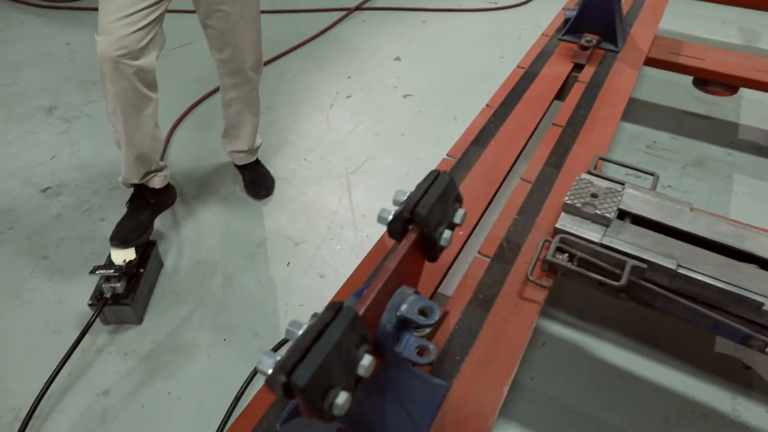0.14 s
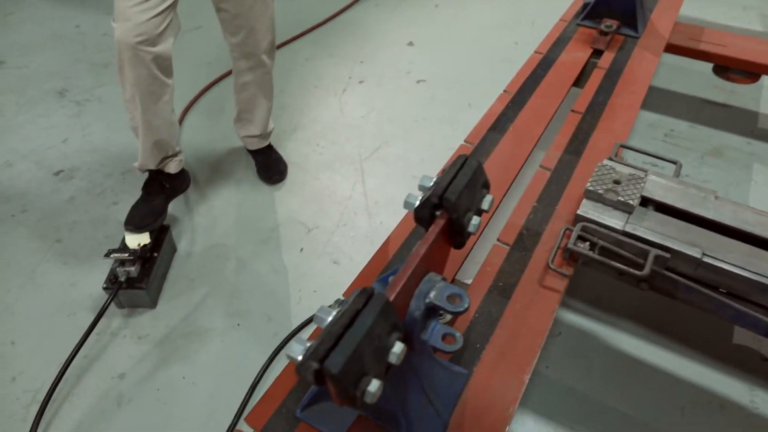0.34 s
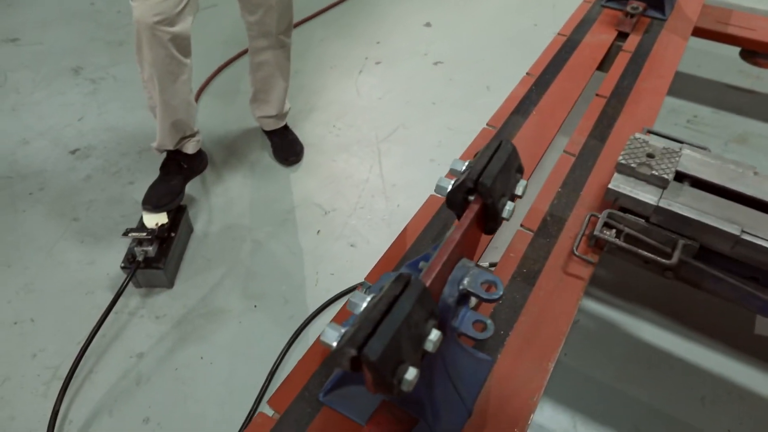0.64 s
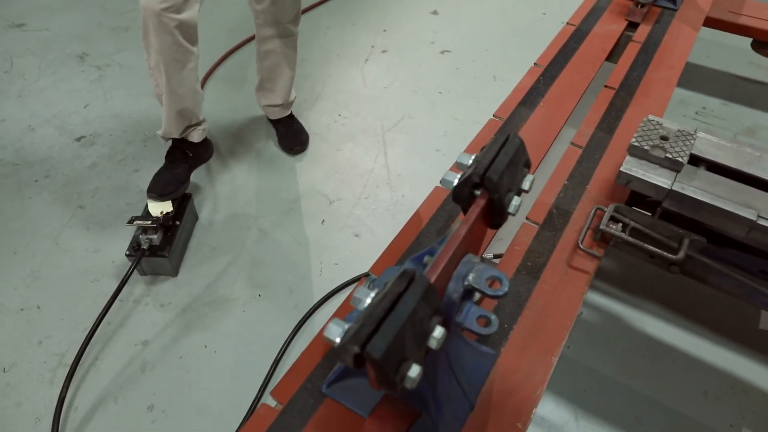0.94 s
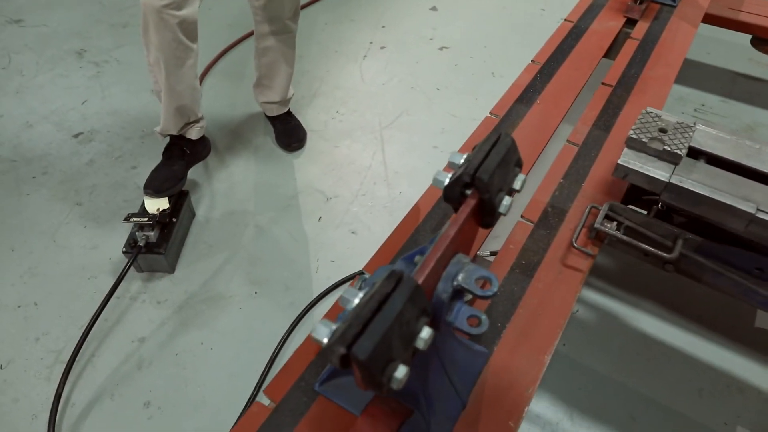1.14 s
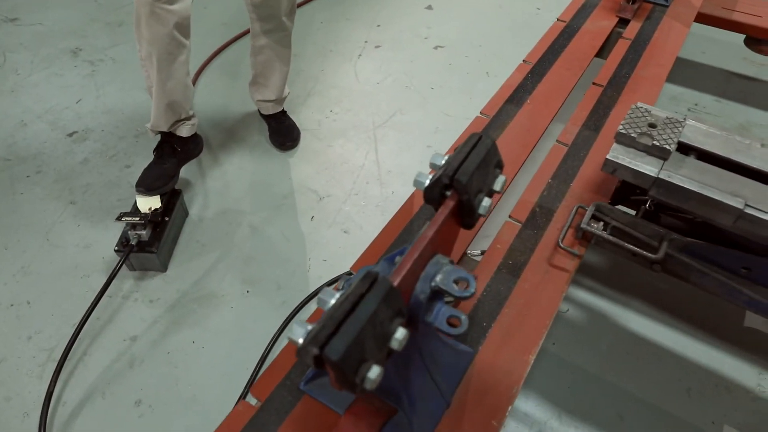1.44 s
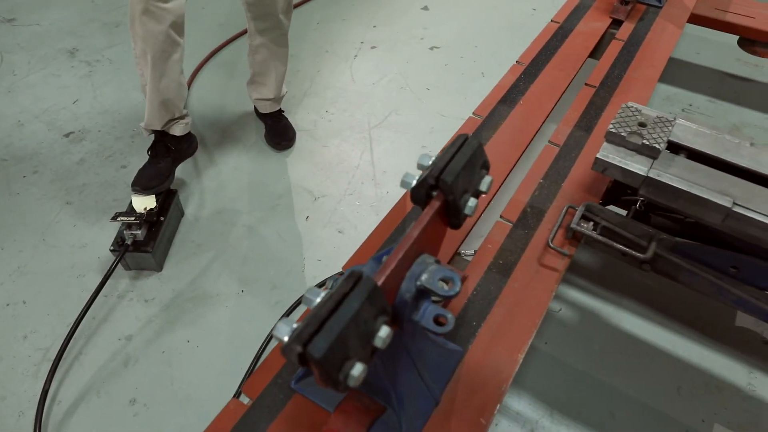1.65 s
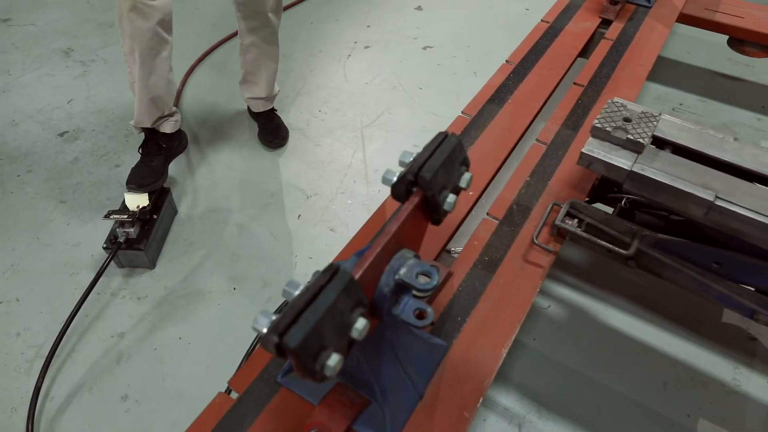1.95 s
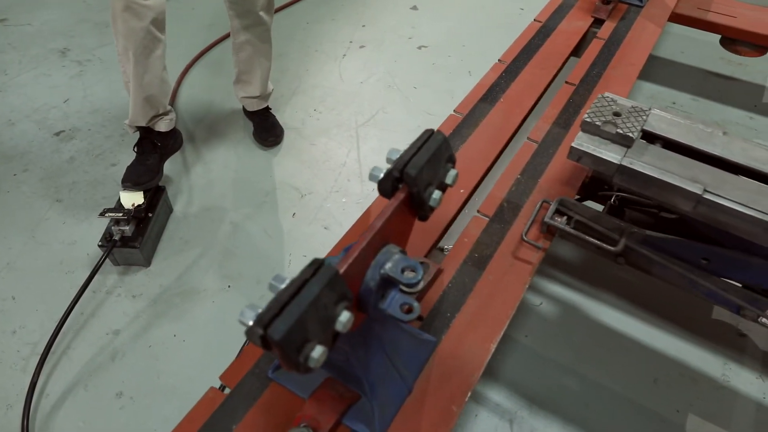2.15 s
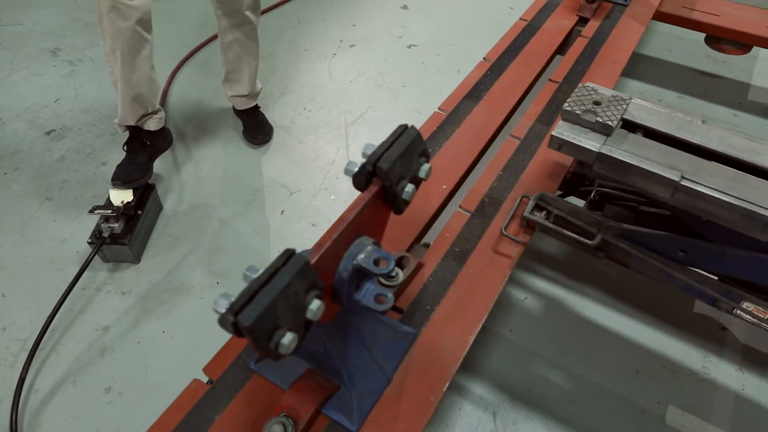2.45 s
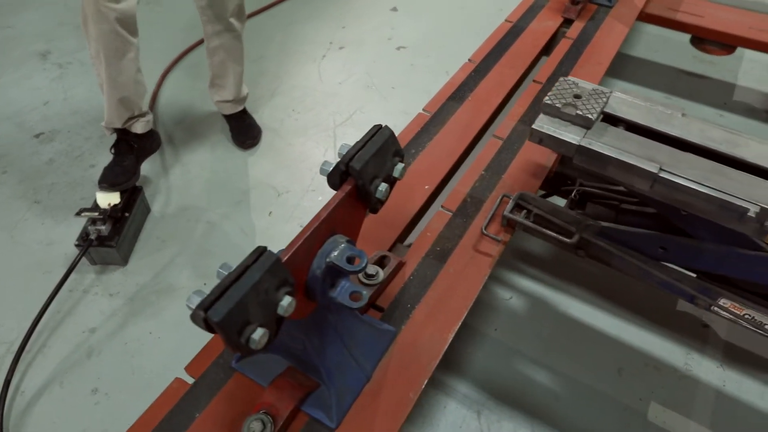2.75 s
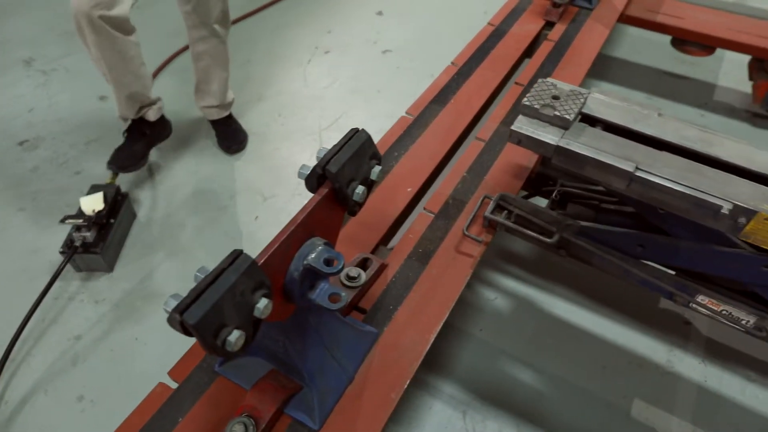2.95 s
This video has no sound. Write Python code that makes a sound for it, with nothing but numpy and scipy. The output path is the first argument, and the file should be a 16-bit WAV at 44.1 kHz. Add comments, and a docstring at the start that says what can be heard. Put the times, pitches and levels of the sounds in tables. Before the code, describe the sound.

An air-powered pump pulses rapidly with a loud hiss, slows briefly, then speeds up and stops.

```python
"""Air pump raising a scissor lift

A foot pedal clicks and starts an air-driven hydraulic pump in a workshop. Running free, the piston
pops about 23 times a second over a loud exhaust hiss. Midway it labours under load: slow puffs, each
with a thump and a return knock, ring the lift's frame. It runs free again, stops, and the hall dies away."""
import sys
import numpy as np
from scipy import signal
from scipy.io import wavfile
from scipy.ndimage import uniform_filter1d

SR = 44100
rng = np.random.default_rng(int(sys.argv[2]) if len(sys.argv) > 2 else 0)


def dump(signal):
    """Clip the signal to [-1, 1] and save it as 16-bit WAV at the path in sys.argv[1]."""
    limited = np.clip(np.atleast_2d(signal).T, -1, 1)
    pcm = np.round(limited * 32767).astype(np.int16)
    wavfile.write(sys.argv[1], SR, pcm)


N = 136710
T = np.arange(N) / SR  # seconds since the scene began
AGE = np.arange(SR // 5) / SR  # seconds since one short sound began


# Stretches of free running: (first stroke [s], last stroke [s], first level [dB], last level [dB])
FREE_RUNS = [(0.2786, 0.5023, -6, 1), (0.5445, 1.236, -0.5, 2.5), (2.212, 2.297, 2.5, -0.5),
             (2.3367, 2.7615, 5.5, 1.5)]
STROKE_GAP_S, FIRST_STROKE_S, FIRST_STROKE_DB = .0434, .2310, 4.5

def free_strokes():
    """The piston starts hard, then beats evenly. Gives rows of (time [s], level [dB])."""
    strokes = [(FIRST_STROKE_S, FIRST_STROKE_DB)]
    for first, last, first_db, last_db in FREE_RUNS:
        count = round((last - first) / STROKE_GAP_S) + 1
        levels = np.linspace(first_db, last_db, count) + 0.2 * rng.standard_normal(count)
        strokes += zip(np.linspace(first, last, count), levels)
    return strokes


# How strongly air leaves the exhaust: (time [s], level [dB])
AIR_FLOW = [(.195, -45), (.229, -3.5), (.234, 0), (.40, 1), (.80, 0.5), (1.255, 0), (1.285, -8),
            (1.855, -45), (1.875, -12.5), (2.15, -7), (2.24, 0), (2.35, 1.5), (2.60, 0.5), (2.775, 1.5),
            (2.805, -19), (2.9, -70)]
# Tone of the hiss and of the pop: (frequency [Hz], level [dB])
HISS_TONE = [(60, -25), (150, -2.5), (300, 1), (500, -3.5), (750, -10.5), (950, -1), (1130, 2.5),
             (1300, -2), (1700, 3), (2200, 1), (2550, 2.5), (2900, -2.5), (3600, 1.5), (4250, 2.5),
             (4900, -0.5), (5600, 1.5), (7300, -0.5), (8800, -2), (10000, -1.5), (12500, 2.5), (15500, 0.5)]
POP_TONE = [(200, -5), (450, 0), (800, -22), (2000, -4), (3500, -35), (4500, 4), (5000, 3), (5600, -2.5),
            (7200, -20), (8700, 3.5), (10500, 11), (15500, -11.5)]

def exhaust(strokes):
    """Air pops out as the valve opens, and the fluttering hiss surges with each stroke."""
    flow = amp(np.interp(T, *np.transpose(AIR_FLOW)))
    wobble = uniform_filter1d(rng.standard_normal(N), size=180)
    flutter = np.exp(0.11 * wobble / wobble.std())
    surge = 1 + 0.93 * repeat(strokes, fade(0.0066))
    hiss = amp(-14.5) * noise(flow * surge * flutter, HISS_TONE)
    pops = repeat(strokes, rise(0.00046) * fade(0.00082))
    return hiss + amp(-4.5) * noise(pops, POP_TONE)


# Notes of the metal valve: (frequency [Hz], level [dB], ring time [s])
VALVE_NOTES = [(2146, -19, 0.053), (4810, -5.5, 0.015), (5080, -10, 0.019), (5620, -20, 0.038),
               (8540, -11.5, 0.017), (8990, -15.5, .016), (13230, -16, .016), (15000, -16, 0.015)]
# It opens, bounces and closes: (time after the stroke [s], level [dB])
VALVE_TICKS = [(0, 1.5), (.0105, -9), (.0278, -21)]

def valve(strokes):
    """The shuttle valve ticks three times a stroke, with nearly the same ring each time."""
    out, t = np.zeros(N), AGE[:SR // 50]
    attack = rise(0.00046, t)
    glide = 7 * t  # each tick's pitch flicks upward
    for time, db in strokes:
        for delay, tick_db in VALVE_TICKS:
            tick = np.zeros(len(t))
            for hz, level, ring_s in VALVE_NOTES:
                pitch = hz * (1 + 0.016 * rng.standard_normal() + glide)
                tick += amp(level - 60 * t / ring_s) * np.sin(2 * np.pi * pitch * t)
            jitter_s = .0001 * rng.standard_normal()
            add(out, time + delay + jitter_s, amp(db + tick_db) * attack * tick)
    return out


# Slow strokes under load: (time [s], puff level [dB], thump level [dB], knock level [dB])
LOADED_STROKES = [(1.379, -4, -3, 0.5), (1.497, -2, -1, 3), (1.636, -0.5, -0.5, 3.5), (1.862, 2.5, 1, 1),
                  (1.923, 3, -3.5, 1), (1.985, 3.5, -2, -1.5), (2.047, 3, -3.5, 0), (2.11, 2, -3, -4),
                  (2.162, 2.5, -3, -4)]
# Tone of a puff: (frequency [Hz], level [dB])
PUFF_TONE = [(80, 9), (240, 9.5), (400, -1.5), (550, -6), (800, -8.5), (1400, 2), (2500, -2), (3000, -2.5),
             (3800, -2.5), (6000, -2), (9000, -5), (15500, -1.5)]

def puffs():
    """Under load, each stroke lets out one separate puff of air."""
    hold_s, release_s = .016, 0.0065
    shape = rise(0.00278) * np.exp(-np.maximum(AGE - hold_s, 0) / release_s)
    return amp(-17) * noise(repeat([row[:2] for row in LOADED_STROKES], shape), PUFF_TONE)


# Notes of the pump body and of the lift's frame: (frequency [Hz], level [dB], ring time [s])
BODY_NOTES = [(46, -35, 0.19), (125, -47, 0.02), (157, -34.5, 0.027), (265, -29.5, 0.16), (380, -27, 0.014)]
FRAME_NOTES = [(68.36, -37.5, 1.6), (95, -40, 0.17), (128.7, -28, 0.51), (257.7, -32.5, 0.58),
               (280, -40, 0.33), (1060, -52, .4), (2100, -37, .4)]

def piston(strokes):
    """Each stroke shakes the pump body and rings the lift's frame, with a low thump."""
    body, frame = ring(BODY_NOTES), ring(FRAME_NOTES)
    free_thump = falling_thump(start_hz=222, end_hz=37.8, glide_s=0.00984, rise_s=0.00022, fade_s=0.0089)
    load_thump = falling_thump(start_hz=326, end_hz=43, glide_s=0.0051, rise_s=0.0056, fade_s=0.0094)
    out = repeat(strokes, amp(1.5) * body + amp(-9.5) * frame)
    out += repeat(strokes, amp(-18) * free_thump)
    for time, _, db, _ in LOADED_STROKES:
        add(out, time, amp(db) * (amp(-1) * body + frame))
        add(out, time - 0.00278, amp(db - 6.5) * load_thump)  # starts just ahead
    return out


def falling_thump(start_hz, end_hz, glide_s, rise_s, fade_s):
    """Each stroke gives a low thump that falls in pitch."""
    hz = end_hz + (start_hz - end_hz) * fade(glide_s)
    return rise(rise_s) * fade(fade_s) * np.sin(2 * np.pi * np.cumsum(hz) / SR)


# Tone of the knock: (frequency [Hz], level [dB])
KNOCK_TONE = [(150, -4), (550, 9), (850, 0.5), (1150, -3), (1600, -7), (2100, 4), (3000, -6), (6000, -9.5),
              (15000, -12)]
# Its hollow ring: (frequency [Hz], level [dB], ring time [s])
KNOCK_NOTES = [(477, -27.5, 0.034), (556, -37.5, 0.042), (1070, -28.5, 0.051)]

def return_knocks(strokes):
    """The piston knocks as it comes back after each stroke."""
    knocks = [(time + .0148, db) for time, _, _, db in LOADED_STROKES]
    knocks += [(time + .0375, -5.5) for time, _ in strokes]
    impacts = amp(-15.5) * noise(repeat(knocks, fade(0.0043)), KNOCK_TONE)
    return impacts + repeat(knocks, ring(KNOCK_NOTES))


# Tone of the starting jolt: (frequency [Hz], level [dB])
JOLT_TONE = [(40, 7), (250, 9.5), (450, -3.5), (800, -9), (3000, -48)]

def jolt():
    """The first stroke jolts the pump."""
    return noise(repeat([(FIRST_STROKE_S, -10.5)], fade(0.0061)), JOLT_TONE)


# Moments when the lift shifts: (time [s], level [dB])
LIFT_SHIFTS = [(.322, 4), (.365, 7), (1.668, 3), (2.185, -1), (2.212, 1)]
# Tone of a clunk: (frequency [Hz], level [dB])
CLUNK_TONE = [(30, -31), (70, -12), (125, 1.5), (200, -14), (300, -14), (600, -13), (3000, -47)]

def lift():
    """Dull clunks ring the frame as the lift takes the weight."""
    clunks = amp(-24) * noise(repeat(LIFT_SHIFTS, fade(0.02)), CLUNK_TONE)
    return clunks + amp(-4) * repeat(LIFT_SHIFTS, ring(FRAME_NOTES))


# Clicks of the pedal and its valve: (time [s], level [dB], fade time [s])
PEDAL_CLICKS = [(0.103, -24.5, .006), (0.1086, -14, 0.0056), (.1110, -12, .0006), (0.1131, -5.5, 0.0011),
                (.1475, -43, 0.0018)]
# Tone of a click: (frequency [Hz], level [dB])
CLICK_TONE = [(200, -10.5), (600, -11), (900, -18), (1800, -5.5), (2500, -2), (3000, -7.5), (3500, 4),
              (4200, 4.5), (4700, 0.5), (6000, -4.5), (7800, -11), (10000, -18.5), (15000, -25)]
# Notes of the pedal and of the foot's thud: (frequency [Hz], level [dB], ring time [s])
PEDAL_NOTES = [(2480, -42, .1), (3575, -43, .18), (3951, -40, .22), (4200, -38, .18), (5220, -39, .25)]
THUD_NOTES = [(33.5, -4, 0.35), (65.4, -2.5, 0.21), (92, -8, .2)]

def pedal():
    """The steel pedal clicks down and rings; the foot's weight thuds on the floor."""
    clicks = sum(repeat([(time, db)], fade(fade_s)) for time, db, fade_s in PEDAL_CLICKS)
    ringing = repeat([row[:2] for row in PEDAL_CLICKS], ring(PEDAL_NOTES))
    thud = repeat([(.113, -22.5)], ring(THUD_NOTES))
    return noise(clicks, CLICK_TONE) + ringing + thud


# Quick echoes: (delay [s], level [dB])
NEAR_ECHOES = [(.0016, -19), (.0029, -20), (.0062, -24.5), (.0125, -23)]

def echoes(sound):
    """Sound bounces off the nearby floor and lift."""
    return repeat(NEAR_ECHOES, sound)


# How long the hall rings: (frequency [Hz], ring time [s])
HALL_RING_TIMES = [(100, 0.5), (500, 0.74), (2000, 0.93), (5000, 0.89), (9000, 0.73), (15000, 0.64)]
# Tone of its echo, and the extra shaping that sets its stereo width: (frequency [Hz], level [dB])
HALL_TONE = [(60, 3), (300, -2), (1000, -1), (4000, -1.5), (9000, -4), (15000, -2.5)]
WIDTH_TONE = [(60, -12), (300, -5), (1000, -5), (4500, -3), (8000, -4), (13000, -14.5)]

def hall(sound, tones):
    """Countless echoes blur into a tail in which each frequency dies at its own speed."""
    hz, t, bands = signal.stft(rng.standard_normal(SR), SR, nperseg=512)
    fall = np.log(1000) / look_up(HALL_RING_TIMES, hz)[:, None]
    gain = amp(sum(look_up(tone, hz) for tone in tones))[:, None]
    bands = bands * np.exp(-fall * t) * np.sqrt(2 * fall / SR) * gain
    tail = signal.istft(bands, SR, nperseg=512)[1][:SR] * rise(0.0091, T[:SR])
    return signal.fftconvolve(sound, tail)[:N]


def drifting_hall(sound, drift_hz=1.09):
    """The microphone drifts, so the sound passes back and forth between two hall tails."""
    return sum(hall(sound * np.cos(np.pi * (drift_hz * T + shift)), [HALL_TONE]) for shift in (0, 0.5))


# Tone of the workshop's background: (frequency [Hz], level [dB])
RUMBLE_TONE = [(25, -12.5), (75, -2.5), (180, -16), (450, -36), (1000, -53), (3000, -47.5), (15000, -57)]

def rumble(db):
    """The workshop rumbles low and steady."""
    return noise(amp(db), RUMBLE_TONE)


def amp(db):
    """Turns decibels into a volume factor: 0 dB changes nothing, -6 dB about halves."""
    return np.exp(np.asarray(db) * np.log(10) / 20)


def rise(seconds, t=AGE):
    """Climbs from 0 to 1 in this time, then stays there."""
    return np.minimum(t / seconds, 1)


def fade(seconds):
    """Dies away from 1, down to about a third after this time."""
    return np.exp(-AGE / seconds)


def look_up(table, hz):
    """Reads a table's value at any frequency, sliding between its rows."""
    frequencies, values = np.transpose(table)
    return np.interp(np.log(hz + 1), np.log(frequencies), values)


def add(mix, time, sound):
    """Mixes a sound in at a given time."""
    part = mix[max(round(time * SR), 0):][:len(sound)]
    part += sound[:len(part)]


def repeat(events, shape):
    """Plays one shape at each (time [s], level [dB])."""
    out = np.zeros(N)
    for time, db in events:
        add(out, time, amp(db) * shape)
    return out


def noise(loudness, tone):
    """A rush of noise; the tone table only sets how strong its lows and highs are against each other."""
    log_gain = np.log(amp(look_up(tone, abs(np.fft.fftfreq(4096, 1 / SR)))))
    spectrum = np.exp(np.conj(signal.hilbert(log_gain)))  # this filter never sounds ahead of a hit
    taps = np.fft.ifft(spectrum).real[:2048]
    return signal.oaconvolve(loudness * rng.standard_normal(N), taps / np.linalg.norm(taps))[:N]


def ring(notes):
    """A struck object sounds several notes at once; each drops 60 dB over its ring time."""
    t = T[:SR]
    return sum(amp(db - 60 * t / ring_s) * np.sin(2 * np.pi * hz * t) for hz, db, ring_s in notes)


def scene():
    """Pump, lift and pedal sound in the rumbling hall, in stereo."""
    strokes = free_strokes()
    pump = exhaust(strokes) + valve(strokes) + puffs() + piston(strokes) + return_knocks(strokes) + jolt()
    direct = pump + lift() + pedal()
    middle = amp(-1.5) * (direct + echoes(direct) + drifting_hall(direct)) + rumble(db=-35)
    side = amp(-3.5) * hall(direct, [HALL_TONE, WIDTH_TONE]) + rumble(db=-46.5)
    return np.array([middle + side, middle - side])


def record(dry):
    """The microphone drops the deepest bass, flattens the loudest peaks and loses the highest treble."""
    low_hz, high_hz, ceiling = 12, 15900, 0.87
    bass_cut = signal.butter(2, low_hz, "high", fs=SR, output="sos")
    treble_cut = signal.firwin(511, high_hz, window=("kaiser", 7), fs=SR)
    clipped = np.clip(signal.sosfilt(bass_cut, dry), -ceiling, ceiling)
    return signal.oaconvolve(clipped, treble_cut[None], "same")


dry = scene()
out = record(dry)
dump(out)
```